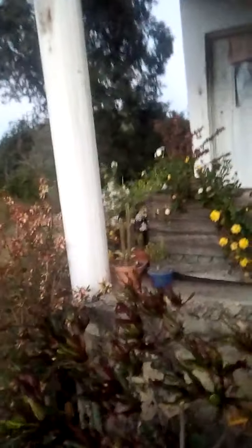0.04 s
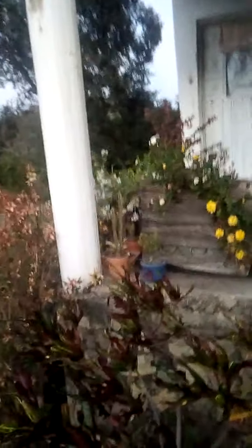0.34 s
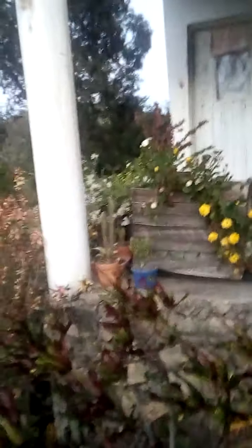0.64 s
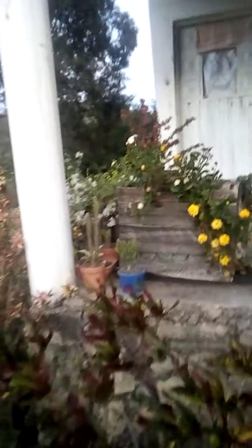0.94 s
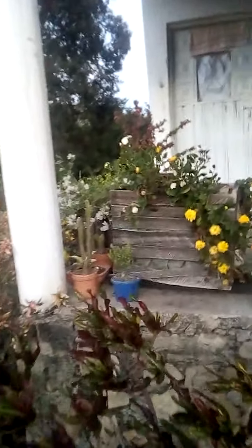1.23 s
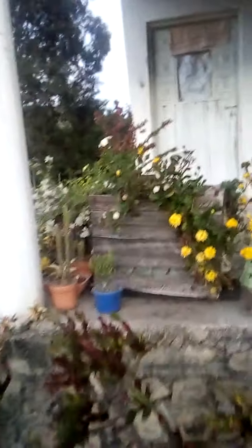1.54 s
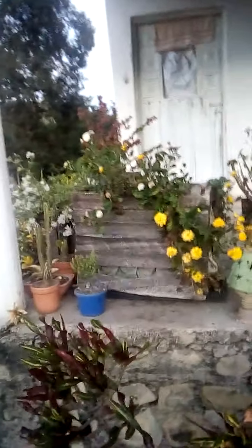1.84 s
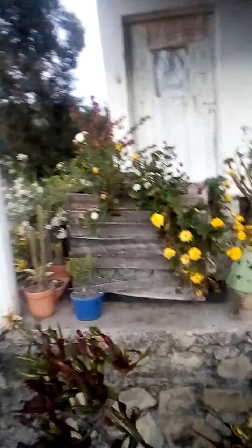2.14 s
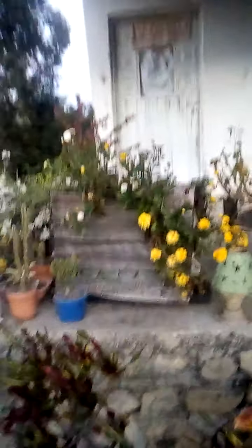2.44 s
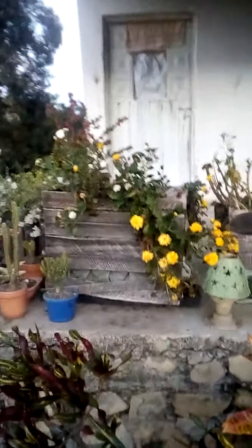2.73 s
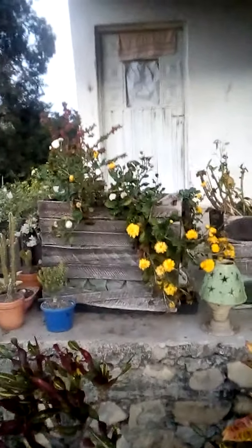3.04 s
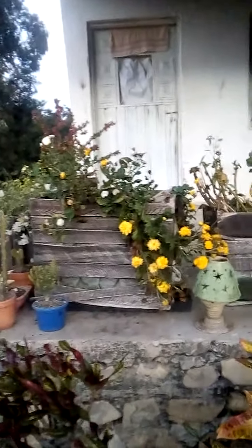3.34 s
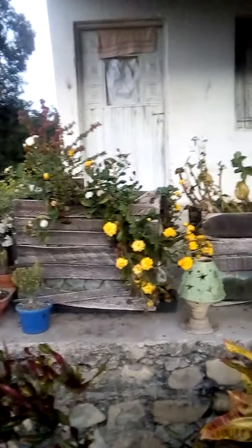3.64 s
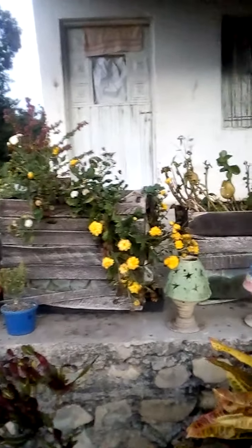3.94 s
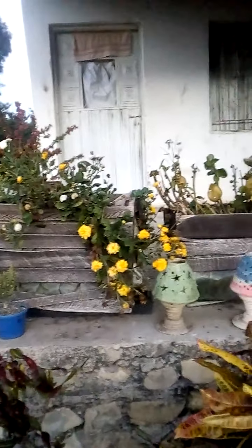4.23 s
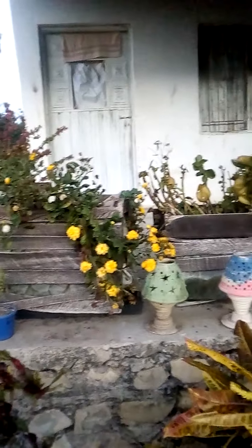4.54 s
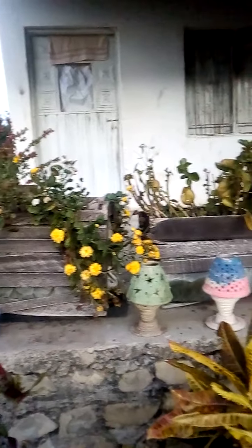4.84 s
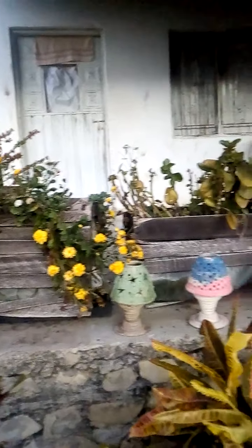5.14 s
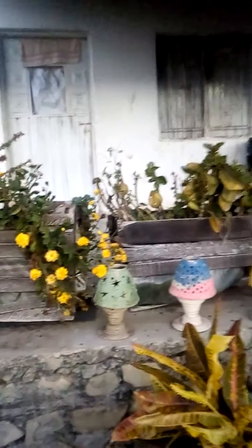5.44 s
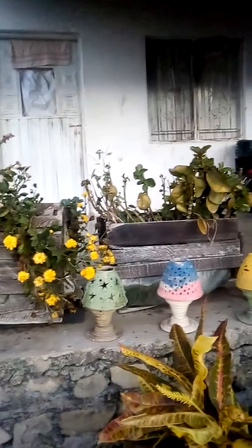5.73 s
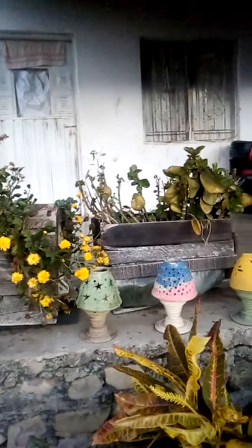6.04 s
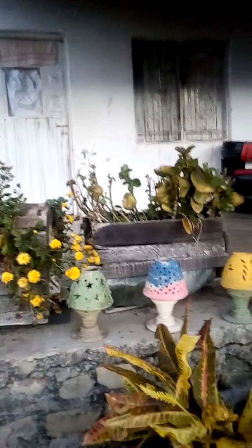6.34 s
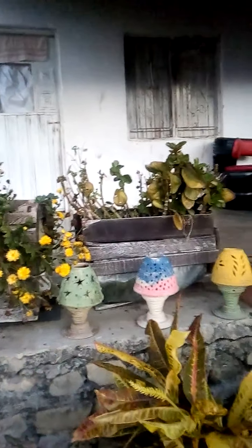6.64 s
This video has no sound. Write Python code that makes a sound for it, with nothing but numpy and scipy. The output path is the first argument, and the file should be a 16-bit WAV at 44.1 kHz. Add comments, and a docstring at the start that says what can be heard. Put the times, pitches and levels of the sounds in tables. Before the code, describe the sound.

In a calm country yard, a faint, high cricket drone runs under scattered chirps, soft footfalls, rustling leaves and one barely heard rooster. A nearby bird breaks in with two loud, sharp squawks in quick succession, followed by a couple of small chips. Two roosters farther from the microphone then overlap in a long, hoarse crow, their calls echoing lightly while the crickets carry on.

```python
"""Dawn in a farmyard. From the start, crickets trill near 5 kHz by stridulation over faint noise, while small
birds chip and whistle. Soft steps fall, leaves rustle, and at 1.2 s a far rooster is faintly heard. At 3.2 s a
bird close by squawks twice, its syrinx the source and its beak the filter. From 4.5 s two roosters crow and
beat against each other, and from 5.6 s a thin high tone near 6.7 kHz sinks above the crow. Throughout, the
house wall and the trees reflect the calls."""
import sys
import numpy as np
from scipy import signal
from scipy.fft import rfft, irfft, next_fast_len
from scipy.io import wavfile
from scipy.ndimage import uniform_filter1d, map_coordinates

SR = 44100
rng = np.random.default_rng(int(sys.argv[2]) if len(sys.argv) > 2 else 0)


def file_out(sig):
    """Save sig as 16-bit WAV at sys.argv[1]."""
    # one column per channel
    cols = np.atleast_2d(sig).T
    # limit, then scale
    lim = np.clip(cols, -1, 1)
    pcm = np.round(lim * 32767).astype(np.int16)
    wavfile.write(sys.argv[1], SR, pcm)


N = 294581
TIME = np.arange(N) / SR


def amp(db):
    """Amplitude ratio: a factor of ten per 20 dB."""
    return 10 ** (np.asarray(db) / 20)


def unit(x):
    """Normalisation to rms 1."""
    return x / np.sqrt(np.mean(x ** 2) + 1e-20)


def response(spectrum, hz):
    """Frequency response: gain interpolated in decibels over log frequency."""
    frequency_hz, level_db = np.transpose(spectrum)
    return amp(np.interp(np.log(hz + 1), np.log(frequency_hz), level_db))


def shaped(x, spectrum):
    """Linear filtering by multiplication of spectra, scaled to rms 1."""
    size = next_fast_len(len(x))
    gain = response(spectrum, np.fft.rfftfreq(size, 1 / SR))
    return unit(irfft(rfft(x, size) * gain, size)[:len(x)])


def add(mix, start_s, sound):
    """Superposition of a sound on the mix."""
    part = mix[max(round(start_s * SR), 0):][:len(sound)]
    part += sound[:len(part)]


def wander(t, hz):
    """Random modulation of rms about 1, lying mostly below hz."""
    knots = rng.standard_normal(8192)
    return map_coordinates(knots, [(t - t[0]) * 2 * hz], order=1, mode="wrap") * np.sqrt(1.5)


def phase_of(hz):
    """Phase is the time integral of frequency."""
    return 2 * np.pi * np.cumsum(hz) / SR


def scatter(x, t60_s, first_s):
    """Scattering from walls and trees: sparse echoes that decay exponentially."""
    t = np.arange(SR) / SR
    taps = rng.choice([-1., 1.], SR) * (rng.random(SR) < 1 / 20)
    taps *= (t > first_s) * amp(-60 * t / t60_s)
    return signal.fftconvolve(x, taps / np.linalg.norm(taps))[:N]


# Spectrum of the background noise, low outdoor rumble and high microphone hiss: frequency_hz, relative_db
BACKGROUND_SPECTRUM = [(25, -25), (60, -12), (140, -4), (205, -5.5), (250, -1), (310, -6), (380, -7.5),
                       (520, -3.5), (800, -8), (1700, -11), (4000, -15.5), (7000, -23.5), (8500, -27.5),
                       (13700, -29.5), (15000, -18)]


def background_noise():
    """Noise floor: faint outdoor rumble and microphone hiss, gently uneven in level."""
    return shaped(rng.standard_normal(N), BACKGROUND_SPECTRUM) * amp(-70.5 + .5 * wander(TIME, hz=17))


def trill(hz, strokes_per_s, sweep, duty, unsteady):
    """Stridulation: each wing stroke is a short tone that sags in pitch as the file slows."""
    strokes = np.cumsum(strokes_per_s * (1 + unsteady * wander(TIME, hz=4))) / SR + rng.random()
    progress = np.minimum(strokes % 1 / duty, 1)
    pitch_hz = hz * (1 + sweep * (.5 - progress) + 0.00388 * wander(TIME, hz=144))
    return unit(np.sin(np.pi * progress) * np.sin(phase_of(pitch_hz)))


# Spectrum of a field of crickets: frequency_hz, relative_db
FIELD_SPECTRUM = [(3900, -39), (4450, -21.5), (4700, -6), (5000, -2), (5200, -2.5), (5450, -7.5),
                  (5700, -15.5), (6200, -23), (7200, -32.5), (9000, -64)]


def cricket_chorus():
    """Incoherent summation: many trills merge into a band of noise, from which two stand out."""
    pair = amp(-5) * trill(4980, strokes_per_s=37.1, sweep=.07, duty=.6, unsteady=0.0078)
    pair += amp(-9.5) * trill(5130, strokes_per_s=45, sweep=0.073, duty=0.61, unsteady=0.11)
    field = shaped(rng.standard_normal(N), FIELD_SPECTRUM) * amp(0.86 * wander(TIME, hz=15))
    return amp(-61 - wander(TIME, hz=1)) * (pair + amp(-1.5) * field)


# The nearest cricket sinks back and returns: time_s, relative_db
CRICKET_LEVELS = [(0, -60), (1.5, -56.5), (2.0, -65), (2.7, -74.5), (3.2, -56.5), (5, -58.5), (6.68, -54.5)]
# Its rests: start_s, end_s
CRICKET_RESTS = [(.36, 0.5), (4.104, 4.7), (6.13, 6.24)]


def near_cricket():
    """Amplitude modulation: wing strokes vary in strength, rest briefly and scatter in the plants."""
    level_db = np.interp(TIME, *np.transpose(CRICKET_LEVELS))
    pitch_hz = 5410 + 14 * wander(TIME, hz=0.86)
    singing = 1. - sum((TIME > start_s) * (TIME < end_s) for start_s, end_s in CRICKET_RESTS)
    song = trill(pitch_hz, strokes_per_s=42.7, sweep=.036, duty=0.54, unsteady=0.0088)
    song *= amp(level_db - 3.5 + wander(TIME, hz=24.3)) * uniform_filter1d(singing, 500)
    return song + amp(-14.5) * scatter(song, t60_s=0.24, first_s=0.0057)


# Whistles of far birds: start_s, length_s, start_hz, end_hz, relative_db, buzz_fraction
FAR_WHISTLES = [(0, 0.041, 4500, 4300, -61.5, 0.87), (0.09, .06, 3910, 4800, -66, 0.2),
                (0.207, 0.052, 1860, 1556, -72.5, 1), (0.304, 0.081, 1426, 1614, -76.5, 0.35),
                (0.447, 0.097, 1313, 1585, -71.5, 0.42), (0.474, 0.056, 3510, 2845, -68.5, 0.87),
                (0.63, 0.11, 4385, 4260, -69.5, 0.3), (0.871, 0.076, 3080, 3470, -80, 0.16),
                (1.503, 0.2, 3180, 3460, -77, 0.5), (2.304, 0.13, 4310, 4300, -66, 0.26),
                (2.558, 0.11, 1690, 1464, -71.5, 0.66), (3.617, .15, 1586, 1730, -73.5, 0.33),
                (4.129, 0.088, 3660, 3720, -74.5, 0.45), (5.688, 0.1956, 2690, 2636, -72.5, 0.35),
                (5.913, 0.32, 2736, 2567, -73, 0.41), (6.142, 0.13, 4440, 4360, -67.5, 0.54)]


def far_birds():
    """Random frequency modulation makes short glides buzz; echoes outweigh the direct sound."""
    out = np.zeros(N)
    for start_s, length_s, start_hz, end_hz, level_db, buzz in FAR_WHISTLES:
        progress = np.arange(0, 1, 1 / (length_s * SR))
        hz = start_hz + (end_hz - start_hz) * progress + 230 * buzz * wander(progress * length_s, 240.4)
        add(out, start_s, amp(level_db) * np.sin(np.pi * progress) ** 0.22 * np.sin(phase_of(hz)))
    return amp(0.5) * out + amp(2.5) * scatter(out, t60_s=0.12, first_s=.004)


# Chips of a small bird: start_s, length_s, start_hz, end_hz, level_db, octave_db
FALLING_CHIPS = [(0.095, 0.095, 4070, 3295, -51, -0.5), (0.406, 0.064, 3997, 3550, -55.5, -12),
                 (3.798, 0.0555, 4140, 3693, -53, -2), (4.015, 0.054, 4020, 3340, -51.5, 13)]


def small_bird():
    """Downward chirps whose second harmonic gains on the fundamental as the pitch falls."""
    out = np.zeros(N)
    for start_s, length_s, start_hz, end_hz, level_db, octave_db in FALLING_CHIPS:
        progress = np.arange(0, 1, 1 / (length_s * SR))
        glide_hz = start_hz + (end_hz - start_hz) * progress
        phase = phase_of(glide_hz * (1 + 0.014 * wander(progress * length_s, hz=260)))
        octave = amp(octave_db) * (0.08 + 1.45 * progress ** 2.332) * np.sin(2 * phase)
        add(out, start_s, amp(level_db) * (np.sin(phase) + octave) * np.sin(np.pi * progress) ** 0.54)
    return out + amp(-9.5) * scatter(out, t60_s=0.21, first_s=.006)


def chatter(count=36):
    """Diffuse field: faint slurs of birds too far off to tell apart arrive only as echoes."""
    out = np.zeros(N)
    for when, pitch, slope, strength, length in rng.random((count, 5)):
        progress = np.arange(0, 1, 1 / ((.04 + .06 * length) * SR))
        jitter = 0.017 * wander(progress * 0.051, hz=190)
        hz = 1300 * 3 ** pitch * (1 + 0.24 * (slope - .5) * progress + jitter)
        slur = np.sin(np.pi * progress) * np.sin(phase_of(hz))
        add(out, when * N / SR, amp(-78.5 + 5 * strength) * slur)
    return scatter(out, t60_s=0.2, first_s=0.012)


# Soft steps: start_s, relative_db
FOOTFALLS = [(.47, -64), (0.83, -70), (2.669, -64), (2.73, -81.5), (5.091, -71)]


def steps():
    """Damped impacts: each step on soft ground is a burst of low noise that decays exponentially."""
    t, out = np.arange(SR // 4) / SR, np.zeros(N)
    ground_spectrum = [(40, -14.5), (130, 5), (220, -7.5), (500, -19), (3000, -62)]
    for start_s, level_db in FOOTFALLS:
        thud = shaped(rng.standard_normal(len(t)), ground_spectrum)
        add(out, start_s, amp(level_db + 1) * thud * (1 - np.exp(-t / 0.0027)) * np.exp(-t / 0.028))
    return out


# Rustles of leaves: peak_s, rise_s, decay_s, level_db
LEAF_RUSTLES = [(.75, .05, 0.045, -72), (1.68, 0.11, 0.093, -70), (2.12, 0.13, 0.097, -60.5),
                (2.37, 0.045, 0.043, -75), (4.738, 0.0032, 0.036, -62.5)]


def leaves():
    """Friction noise: brushed foliage gives grainy swishes that swell and decay."""
    swell = sum(amp(level_db) * np.exp(-np.maximum((peak_s - TIME) / rise_s, (TIME - peak_s) / decay_s))
                for peak_s, rise_s, decay_s, level_db in LEAF_RUSTLES)
    grains = rng.standard_normal(N) * amp(2.1 * wander(TIME, hz=385))
    leaf_spectrum = [(300, -7), (1000, -4), (4000, -6.5), (6400, 3.5), (8500, -20.5), (12000, -28.5)]
    return swell * shaped(grains, leaf_spectrum)


def envelope(rise_s, hold_s, fall_s, depth_db):
    """Exponential attack and release around a hold: times, and decibels relative to the peak."""
    t = np.arange(0, rise_s + hold_s + fall_s, 1 / SR)
    return t, -depth_db * np.maximum(np.maximum(1 - t / rise_s, (t - rise_s - hold_s) / fall_s), 0)


def arch(progress, start_hz, end_hz, arch_hz):
    """Parabolic pitch contour: vocal effort lifts the middle of a glide."""
    return start_hz + (end_hz - start_hz) * progress + arch_hz * (1 - (2 * progress - 1) ** 2)


def arched(start_s, rise_s, hold_s, fall_s, start_hz, end_hz, arch_hz, level_db):
    """Contours of a sustained call: times, arching pitch and level."""
    t, shape_db = envelope(rise_s, hold_s, fall_s, depth_db=17)
    return start_s + t, arch(t / t[-1], start_hz, end_hz, arch_hz), level_db + shape_db


def note(t, hz, level_db, harmonics_db, jitter, jitter_hz, tract=None):
    """Harmonic series on a trembling fundamental, weighted by a vocal tract if one is given."""
    out = np.zeros(N)
    phase = phase_of(hz * (1 + jitter * wander(t, jitter_hz)))
    series = sum(amp(db) * (response(tract, k * hz) if tract else 1) * np.sin(k * phase)
                 for k, db in enumerate(harmonics_db, 1))
    add(out, t[0], series * amp(level_db) * signal.windows.tukey(len(t), .05))
    return out


# A far crow: start_s, rise_s, hold_s, fall_s, start_hz, end_hz, arch_hz, relative_db
FAR_SYLLABLES = [(1.2, 0.075, .06, 0.146, 619.5, 693, 20.5, -70),
                 (1.458, 0.059, 0.033, 0.088, 685, 734, -0.5, -65.5),
                 (1.561, .1, .5, .48, 749, 698, 29.5, -66)]
# Its harmonics, from the first up: relative_db
FAR_HARMONICS_DB = [-14, -12, 5, -10, -10]


def far_rooster():
    """Biphonation: a hoarse, broken crow with a second, lower pitch, blurred by the hillside."""
    voice = np.zeros(N)
    for syllable in FAR_SYLLABLES:
        t, hz, level_db = arched(*syllable)
        voice += note(t, hz, level_db, FAR_HARMONICS_DB, jitter=0.022, jitter_hz=150)
        voice += note(t, hz * .89, level_db - 5.5, FAR_HARMONICS_DB, jitter=0.0465, jitter_hz=177)
    fading = amp(2.5 * wander(TIME, hz=10))
    return amp(-6) * scatter(voice * fading, t60_s=0.13, first_s=0.0045)


def slurred(start_s, rise_s, hold_s, fall_s, start_hz, end_hz, middle_s, slur_s, level_db):
    """Sigmoid glide: times, pitch and level of a note that slips between two pitches."""
    t, shape_db = envelope(rise_s, hold_s, fall_s, depth_db=34.5)
    slip = .5 + .5 * np.tanh(2 * (t - middle_s) / slur_s)
    return start_s + t, start_hz + (end_hz - start_hz) * slip, level_db + shape_db


# Harmonics of each kind of squawk note, from the first up: relative_db
DOWN_HARMONICS = [-12.5, -15, -4.5, -3, -15, -0.5, -10.5, -14, -23, -20, -28]
UP_HARMONICS = [2.5, -11.5, -10, -21.5]
RASP_HARMONICS = [-5.5, 6.5, -6, -11, -12.5, -5.5, 4.5, 4, -17]
SPLIT_HARMONICS = [-18, -3, -11.5, 1, -5.5, -3, -4]
END_HARMONICS = [-0.5, -7, -20, -10, -8, -16.5, -9, -38]
# Resonances of throat and beak: frequency_hz, gain_db
BEAK_RESPONSE = [(800, -21.5), (1600, -22), (2400, -19.5), (3100, -13.5), (3700, 1), (4200, 1),
                 (5000, -4.5), (5800, 5), (7000, 3.5), (8000, -8.5), (8700, -6), (9600, -23.5),
                 (10700, -14), (13000, -40), (15200, -13.5)]
# Notes of the near bird: start_s, rise_s, hold_s, fall_s, start_hz, end_hz,
# middle_s (of the slur, from the note's start), slur_s, level_db, jitter_fraction, harmonics_db
SQUAWK_NOTES = [(3.201, 0.039, 0.05, .033, 1124, 772.5, 0.062, 0.057, -32, .009, DOWN_HARMONICS),
                (3.279, 0.011, 0.017, 0.023, 1654, 1543, 0.021, 0.049, -30, .006, UP_HARMONICS),
                (3.405, .024, 0.021, 0.014, 2437, 3040, 0.041, .036, -25.5, 0.0071, UP_HARMONICS),
                (3.423, 0.019, 0.044, 0.045, 749.6, 933, 0.036, 0.0516, -38.5, 0.024, RASP_HARMONICS),
                (3.482, 0.035, .003, 0.1, 3427, 4358, .034, 0.0522, -18.5, 0.0079, UP_HARMONICS),
                (3.51, 0.026, 0.028, 0.033, 1362, 1447, 0.038, 0.038, -35.5, 0.0072, SPLIT_HARMONICS),
                (3.53, 0.029, 0.033, 0.019, 1337, 1272, .025, .04, -32.5, .006, END_HARMONICS)]


def near_bird():
    """Source and filter: notes from both sides of the syrinx share one beak; the wall reflects them."""
    voice = sum(note(*slurred(*contour), harmonics_db, jitter, jitter_hz=521, tract=BEAK_RESPONSE)
                for *contour, jitter, harmonics_db in SQUAWK_NOTES)
    voice += amp(-10) * rasp(voice)
    wall_echo = amp(-29) * np.interp(TIME - .019, TIME, voice)
    early = amp(-6) * scatter(voice, t60_s=0.11, first_s=0.0042)
    late = amp(-19.5) * scatter(voice, t60_s=0.41, first_s=0.044)
    return voice + wall_echo + early + late


def rasp(voice):
    """Turbulence in the syrinx grows with the voice, saturates, and leaves by the same beak."""
    loudness = np.sqrt(abs(uniform_filter1d(voice ** 2, 400)))
    return shaped(rng.standard_normal(N), BEAK_RESPONSE) * 0.014 * np.tanh(loudness / 0.025)


# Notes of the crow, each lasting until the next: start_s, start_hz, end_hz, arch_hz,
# overtones_db, overtone_swell_db, fundamental_db, fundamental_swell_db, roughness_fraction
CROW_NOTES = [(4.452, 515.2, 594, -1, -52.5, -7, -69, 6, 0.42),
              (4.495, 638, 650, 2, -62, 4, -73.5, -5, 0.25),
              (4.712, 850, 885.4, 2, -43.5, 4, -49.5, -7.5, 0.2),
              (4.762, 938, 849, 15.5, -49, 0.5, -53, -6, 0.3),
              (4.835, 849, 858, -2, -51, -4, -56, -6, 0.15),
              (5.462, 665.7, 688.4, -0.5, -63, -4.5, -64.5, 20.5, .33),
              (5.764, 845.3, 829.4, 3, -55.5, -10.5, -77.5, -7, .1),
              (6.04, 830, 782.4, 5.5, -59, 8.5, -69.5, 5, 0.21),
              (6.226, 614.5, 573, 17.5, -58.5, 1.5, -71.5, -17, 0.19)]
CROW_END_S = 6.535
# Cracks in the voice: time_s, roughness_fraction
VOICE_CRACKS = [(4.695, .5), (5.051, 0.37), (5.1, 0.81), (5.219, 0.81), (5.44, 0.4), (5.75, 0.23),
                (6.245, 0.74), (6.285, .6)]


def crow_contours(t):
    """Vocal registers: low and high notes join without a gap; each crack is rough, flat and weak."""
    edges_s = [row[0] for row in CROW_NOTES] + [CROW_END_S]
    place = np.interp(t, edges_s, np.arange(len(edges_s)))
    index = np.minimum(place.astype(int), len(CROW_NOTES) - 1)
    progress = place - index
    columns = np.array(CROW_NOTES)[index].T
    _, start_hz, end_hz, arch_hz, upper_db, upper_swell_db, low_db, low_swell_db, roughness = columns
    crack = sum(depth * np.exp(-((t - time_s) / .019) ** 2) for time_s, depth in VOICE_CRACKS)
    dip_db = -4.5 * crack
    overtones_db = upper_db + upper_swell_db * (progress - .5) + dip_db
    fundamental_db = low_db + low_swell_db * (progress - .5) + dip_db
    hz = arch(progress, start_hz, end_hz, arch_hz) * (1 - .035 * crack)
    return uniform_filter1d([hz, abs(roughness + crack), overtones_db, fundamental_db], 350, axis=1)


# Resonances of the rooster's throat: frequency_hz, relative_db
THROAT_RESPONSE = [(1190, -35), (1290, 10), (1700, 12.5), (2000, 8), (2500, -28.5), (3400, -18),
                   (4200, -27.5), (5900, -37), (6700, -48), (7500, -55)]


def rooster():
    """A formant near 1.7 kHz shapes the strained crow; jitter and shimmer roughen it where it breaks."""
    t, out = np.arange(CROW_NOTES[0][0], CROW_END_S, 1 / SR), np.zeros(N)
    hz, roughness, overtones_db, fundamental_db = crow_contours(t)
    jitter = (.09 * roughness ** 1.7 + .003) * wander(t, hz=200)
    shimmer = .7 * roughness * wander(t, hz=200)
    waver = 0.0033 * wander(t, hz=9)
    phase = phase_of(hz * (1 + jitter + waver))
    slide_hz_per_s = uniform_filter1d(abs(np.gradient(hz)) * SR, 400)
    falter = uniform_filter1d(1 / (1 + slide_hz_per_s / 7000), 300)  # dips at a change of register
    order = np.arange(2, 11)[:, None]
    brightness = amp(0.36 * np.minimum(fundamental_db + 49, 0))  # the full voice is the brighter
    weights = response(THROAT_RESPONSE, order * hz)
    weights *= np.where(order > 3, brightness * (1 + 3 * roughness), 1)
    overtones = (weights * np.sin(order * phase)).sum(0) / np.linalg.norm(weights, axis=0)
    voice = amp(overtones_db + 4.5) * overtones + amp(fundamental_db + 2.2) * np.sin(phase)
    add(out, t[0], voice * (1 + shimmer) * falter * signal.windows.tukey(len(t), .02))
    return out + amp(-9) * scatter(out, t60_s=0.98, first_s=.012)


# The second crow: start_s, rise_s, hold_s, fall_s, start_hz, end_hz, arch_hz, level_db
SECOND_SYLLABLES = [(4.52, 0.26, 0.57, 0.084, 805.6, 751.4, 27.4, -59.5),
                    (6.187, 0.054, .07, 0.166, 718, 656, 8, -73)]
# Its harmonics, from the first up: relative_db
SECOND_HARMONICS_DB = [1.5, -6, -24, -22.5]


def second_rooster():
    """Beating: a slightly lower crow interferes with the first."""
    voice = sum(note(*arched(*syllable), SECOND_HARMONICS_DB, jitter=0.024, jitter_hz=154.1)
                for syllable in SECOND_SYLLABLES)
    return voice + amp(-1) * scatter(voice, t60_s=0.97, first_s=0.006)


# A thin high tone above the crow: start_s, rise_s, hold_s, fall_s, start_hz, end_hz, arch_hz, level_db
HIGH_NOTE = (5.6, .28, .24, .16, 6730, 6380, 150, -71)


def high_tone():
    """Amplitude modulation makes one high, pure, sinking tone flutter."""
    tone = note(*arched(*HIGH_NOTE), harmonics_db=[0], jitter=.004, jitter_hz=200)
    return tone * amp(2.6 * wander(TIME, hz=14))


def scene():
    """Superposition: all sources add in one channel."""
    birds = near_bird() + small_bird() + far_birds() + chatter() + high_tone()
    roosters = rooster() + second_rooster() + far_rooster()
    crickets = near_cricket() + cricket_chorus()
    return (birds + roosters + crickets + background_noise() + leaves() + steps())[None]


def record(dry):
    """Band limiting: a linear-phase low-pass filter removes the highest treble."""
    lowpass = signal.firwin(511, 15600, window=("kaiser", 9), fs=SR)
    return signal.oaconvolve(dry, lowpass[None], "same")


dry = scene()
out = record(dry)
file_out(out)
```